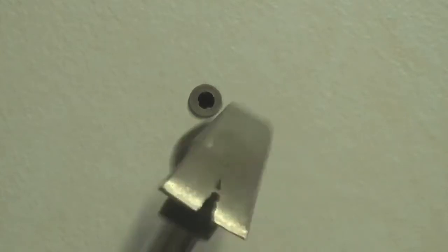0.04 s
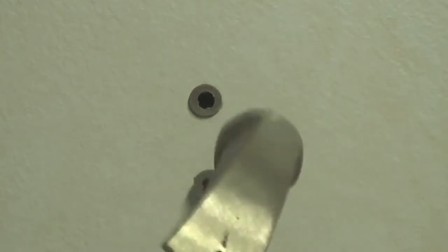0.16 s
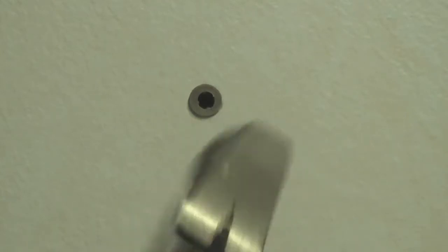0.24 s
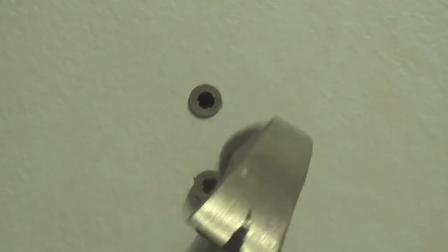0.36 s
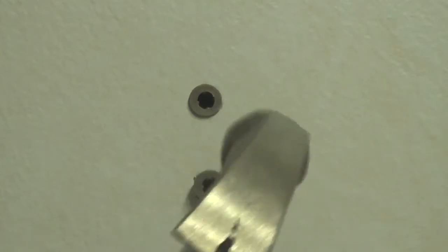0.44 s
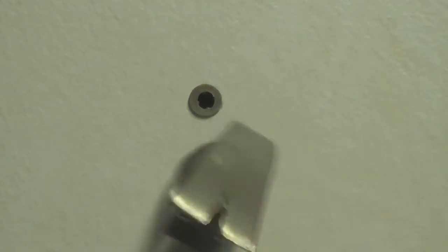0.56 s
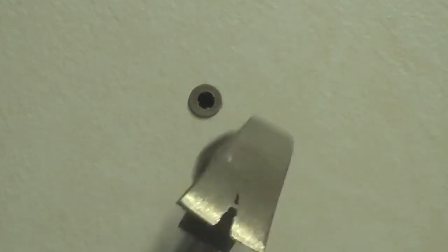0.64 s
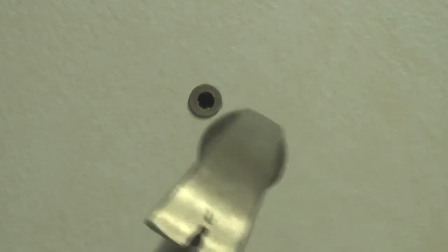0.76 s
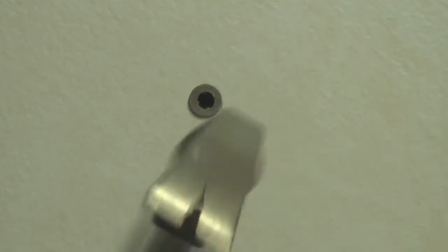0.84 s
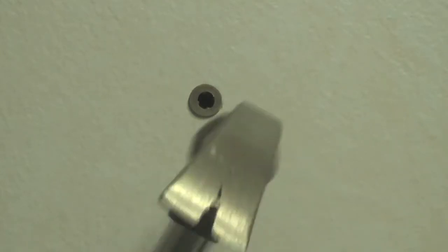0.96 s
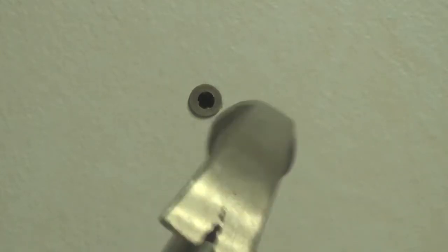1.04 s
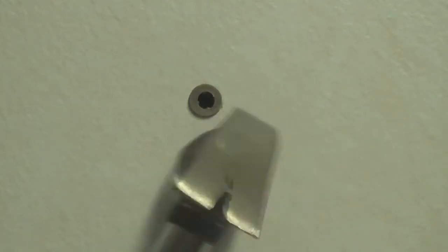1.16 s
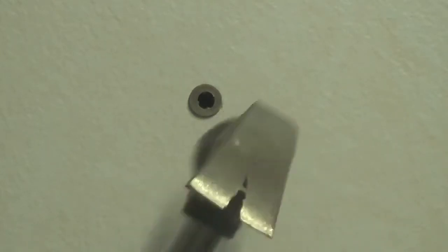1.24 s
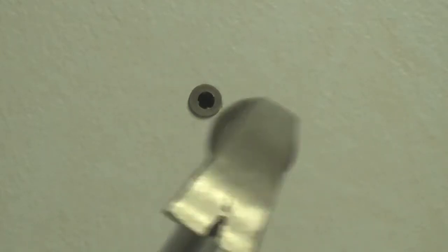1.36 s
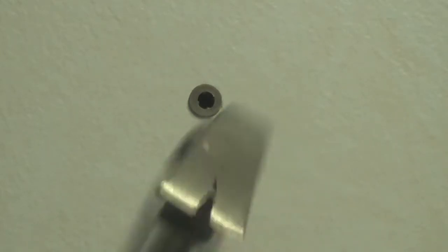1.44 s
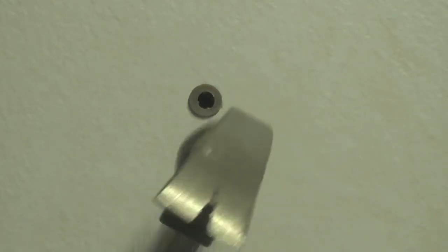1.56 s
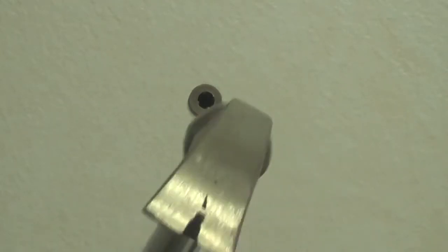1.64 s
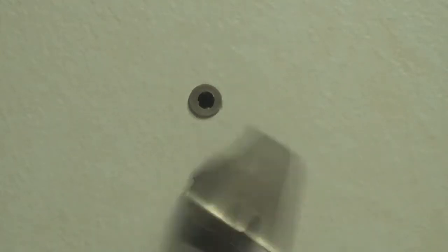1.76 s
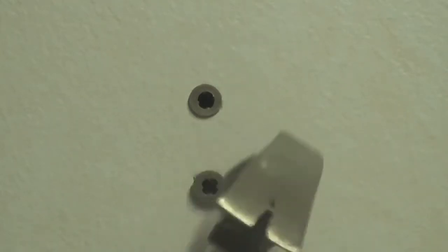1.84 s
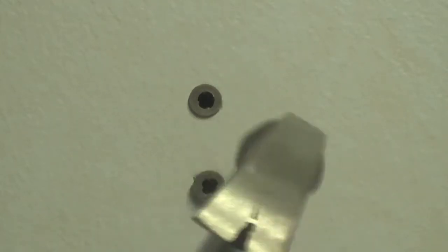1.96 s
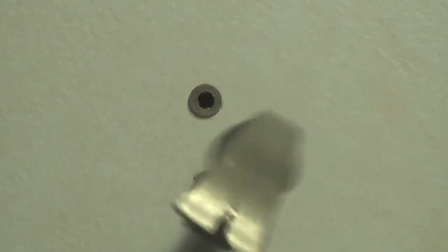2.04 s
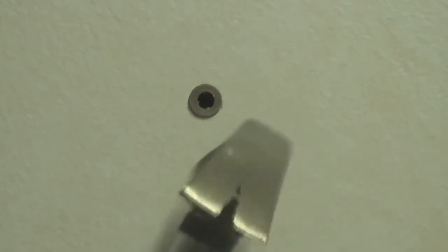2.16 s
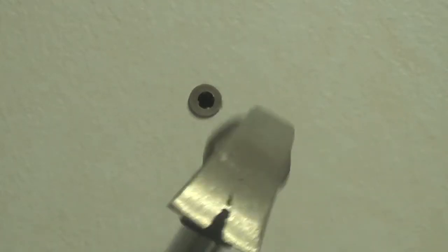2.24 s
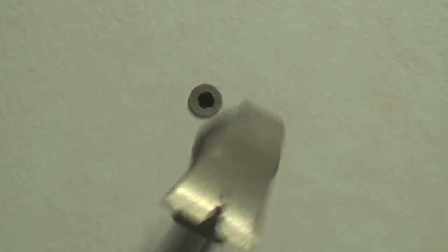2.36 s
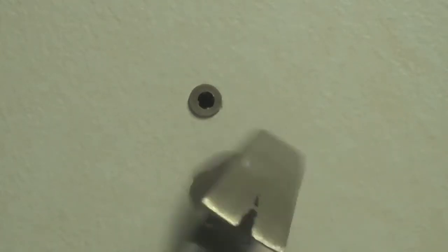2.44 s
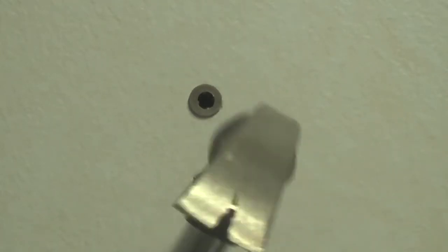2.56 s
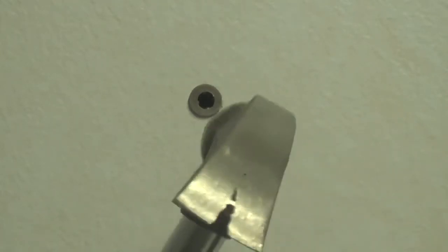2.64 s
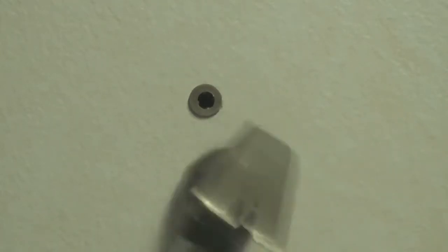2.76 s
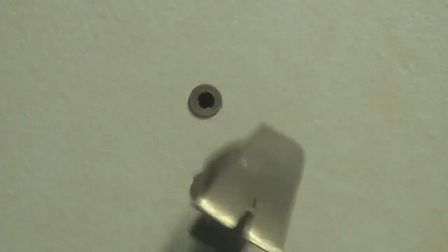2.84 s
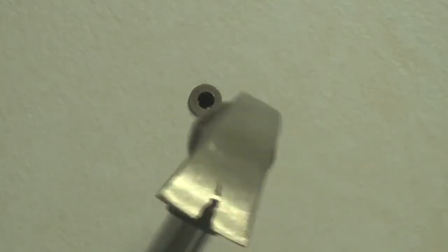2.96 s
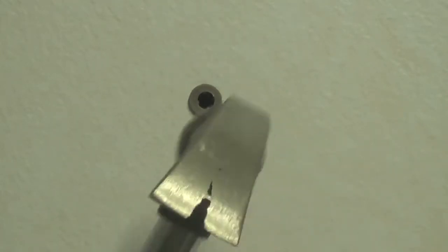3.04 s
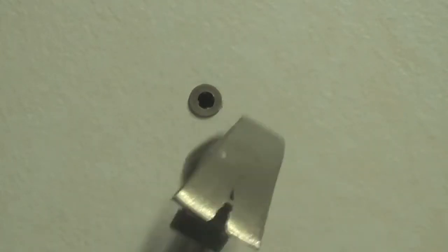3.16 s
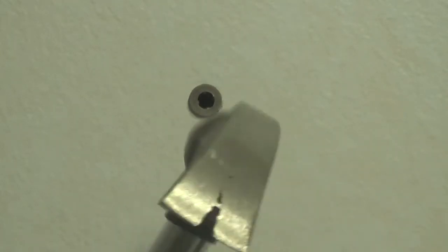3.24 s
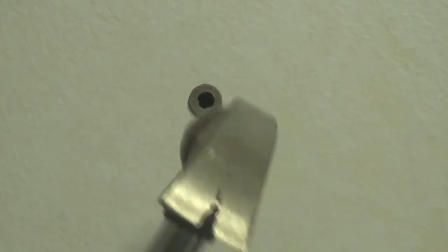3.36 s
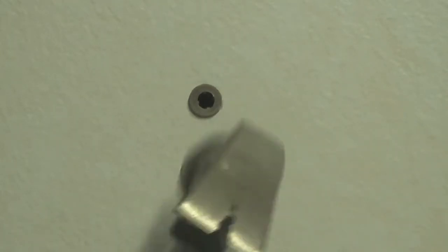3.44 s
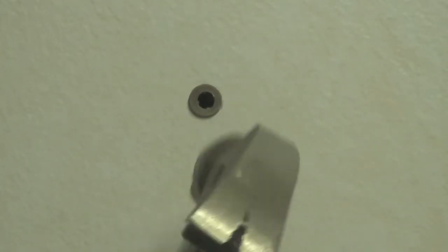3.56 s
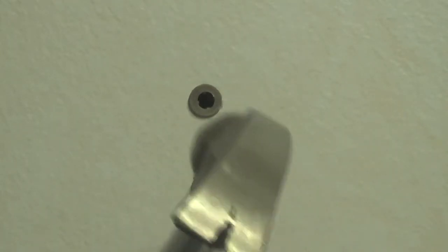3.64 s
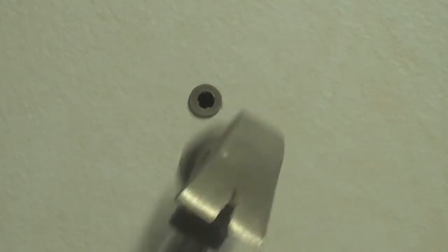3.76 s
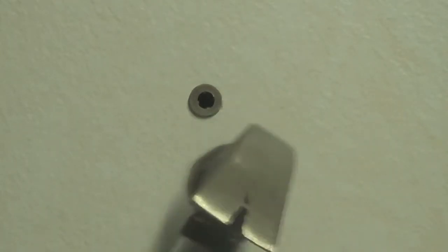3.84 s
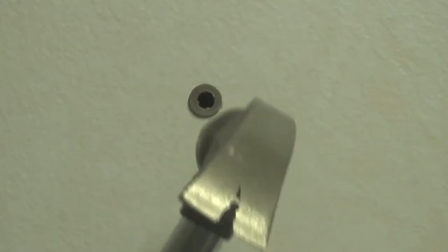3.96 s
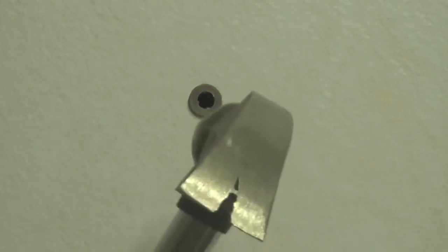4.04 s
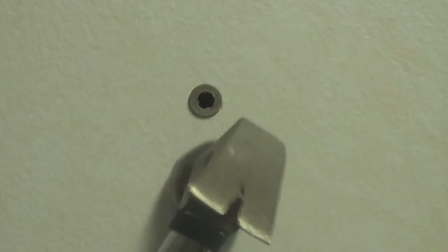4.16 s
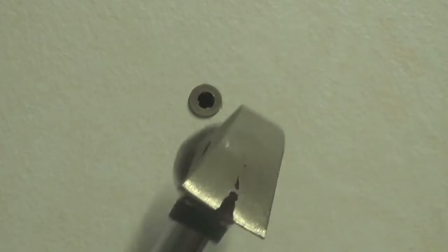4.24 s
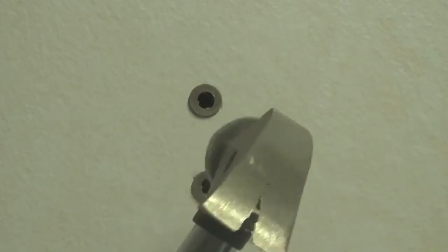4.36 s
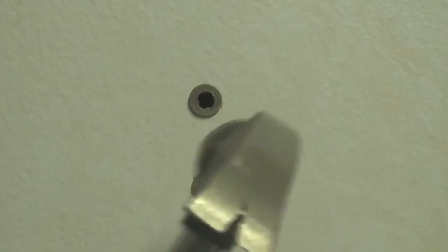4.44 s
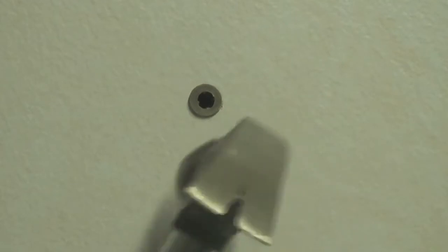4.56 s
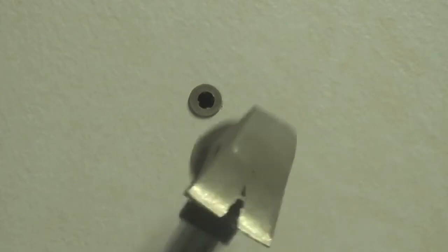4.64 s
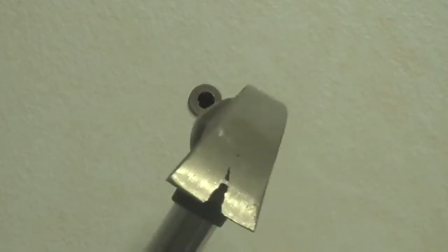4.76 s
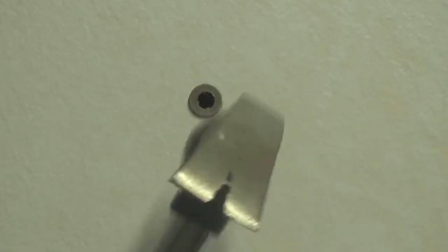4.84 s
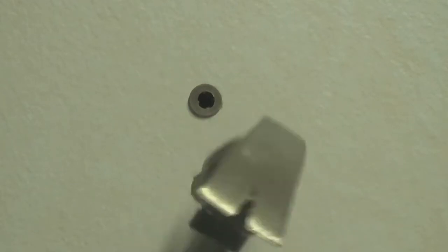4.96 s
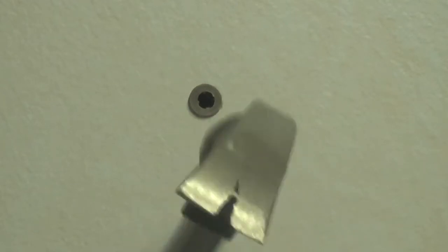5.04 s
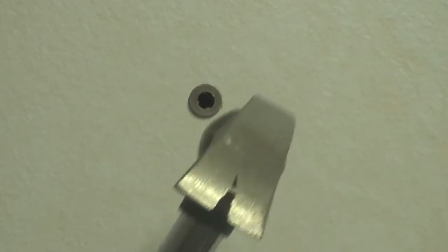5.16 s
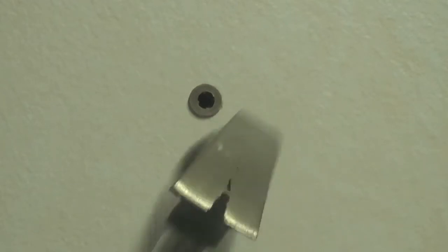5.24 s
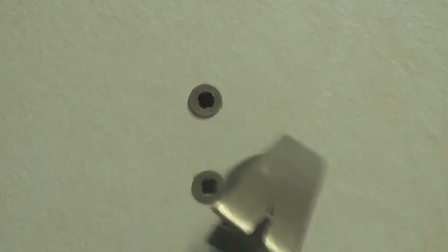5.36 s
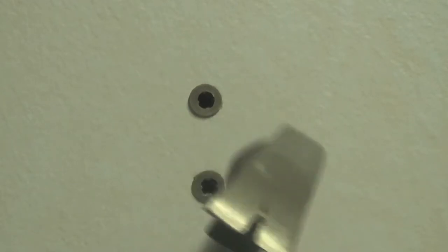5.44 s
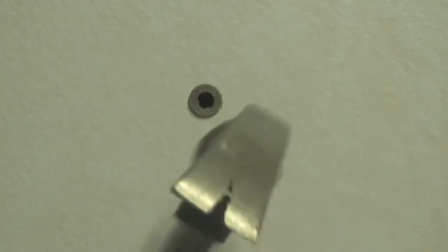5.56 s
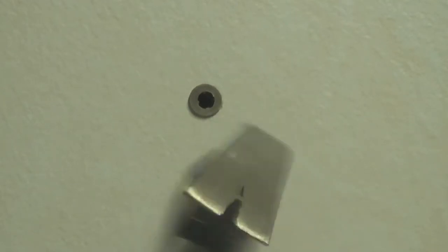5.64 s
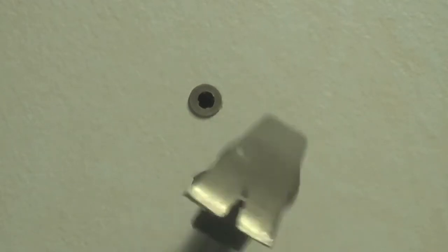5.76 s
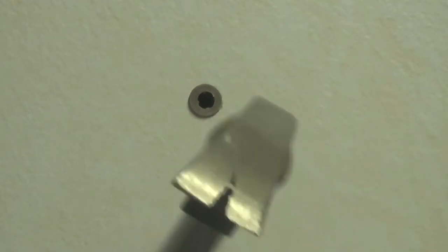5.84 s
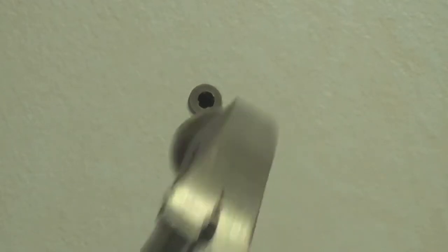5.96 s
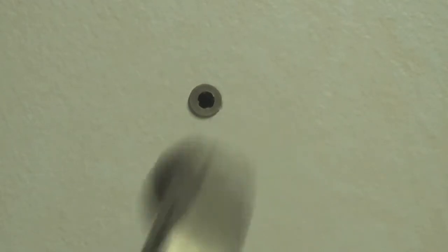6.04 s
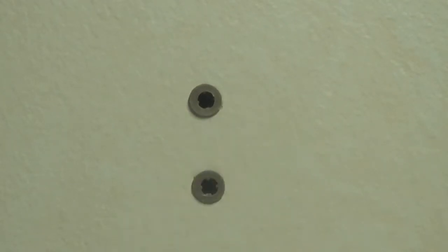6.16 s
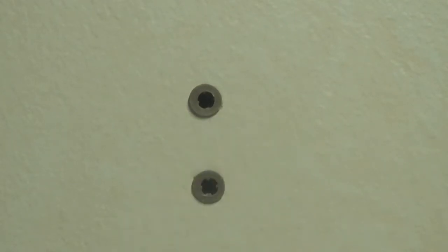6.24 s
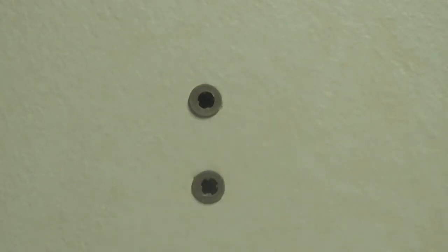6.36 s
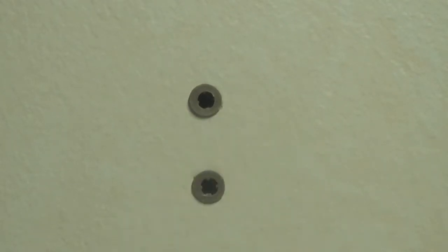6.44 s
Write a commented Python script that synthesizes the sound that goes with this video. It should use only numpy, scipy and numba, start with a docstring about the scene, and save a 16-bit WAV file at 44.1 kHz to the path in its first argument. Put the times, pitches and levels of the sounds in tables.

```python
"""A small steel hammer taps a plastic anchor into a hollow wall, close up in a bare room.
We open on the tail of a blow, over quiet air, hum and a thin camera whine. Each new tap cracks on the
plastic, then rings the same low modes of wall and room; above them, dense modes blur into a decaying wash,
coloured by how the hammer face lands. A limiter flattens the front of each hit.
The taps gradually slow, and the knock turns hollower as the anchor seats."""
import sys
import numpy as np
from scipy import signal
from scipy.fft import rfft, irfft
from scipy.io import wavfile
from numba import njit

SR = 44100
rng = np.random.default_rng(int(sys.argv[2]) if len(sys.argv) > 2 else 0)


def to_wav(sig):
    """Store sig (one row per channel, or 1-D mono) as 16-bit WAV at the path in sys.argv[1].

    Samples outside -1..1 are clipped; the rate is SR.
    """
    pcm = np.clip(np.atleast_2d(sig), -1, 1) * 32767
    pcm = np.round(pcm).astype(np.int16)
    wavfile.write(sys.argv[1], SR, pcm.T)  # frames by channels


N = 286340

# The hits; the first lands before the start: (time [s], strength [dB], hardness as treble [dB],
# hollow knock [dB], treble spit [dB], dip centre [Hz], dip depth [dB])
BLOWS = [(-0.1154, 4, 1.5, -2.5, -23, 3540, 1.5), (0.1756, 4, 1, -1.5, -16, 3460, 2),
         (0.4694, 3, 1.5, -2.5, -16, 3270, 15.5), (0.7718, 3, 5, -3.5, -26, 3640, 1.5),
         (1.0741, 3, 2.5, -3, -27, 3470, 7), (1.3665, 2.5, 2, -1.5, -16.5, 5470, -0.5),
         (1.6646, 1, 5, -1.5, -13, 5450, 0), (1.9776, -3, 7.5, 2.5, -43, 4330, 12),
         (2.3023, -4.5, 6.5, 4, -13, 3340, 14.5), (2.627, -2, 3.5, -1.5, -19, 5460, 0),
         (2.9791, -1.5, 2.5, 0, -18.5, 2850, 10), (3.3053, -2, 10, -3, -7.5, 1420, 4.5),
         (3.6821, -0.5, -1.5, -4, -19.5, 3670, 8.5), (4.0109, 1.5, -2.5, -1, -19, 1780, 0.5),
         (4.3771, 0.5, -2, 3, -18.5, 2460, 12), (4.7247, 1.5, -3, 2.5, -24, 6800, 4),
         (5.094, 1, -0.5, 1.5, -19, 1900, -0.8), (5.4743, 0.5, -1, 5.5, -43, 6300, 7.5),
         (5.834, 3, -5, 4.5, -22, 4100, 8)]
# Tone colour of the hammer's contact: (frequency [Hz], base gain [dB], tilt with strength [dB/dB],
# tilt with hardness [dB/dB], tilt with knock [dB/dB])
CONTACT_COLOUR = [(117, -1.5, -.5, 0, 0), (410, -1, 0, 0.5, 0.5), (590, -1, 0.5, 0.04, 0.68),
                  (786, -0.5, 0.32, 0.56, 1.5), (1110, -3, 0.19, 0.91, 0.25), (2440, -1, 0, 1.1753, 0.5),
                  (3270, 0.5, 0, 1, 0.62), (8450, -3, 0.5, 1.33, 0.32), (13000, -5, 1, 0.84, 0)]
# Body of the hollow wall; the sign of a swing says which side of the node the microphone is on:
# (frequency [Hz], t60 [s], left swing [linear], right swing [linear])
WALL_MODES = [(292.6, 0.44, -0.109, -0.168), (304.3, 0.51, 0.094, 0.081), (312.3, 0.36, -0.228, 0.153),
              (316.9, 0.32, -0.001, -0.243), (352.8, 0.35, -0.11, -0.12), (359.0, 0.4, 0.172, 0.256),
              (369.9, 0.28, -0.507, -0.757), (372.1, 0.28, 0.701, 0.661), (379.4, 0.3, -0.471, -0.215),
              (386.9, 0.28, -0.166, -0.412), (395.0, 0.28, 0.257, -0.101), (399.5, 0.28, -0.318, 0.091),
              (421.7, 0.7, 0.046, 0.065), (426.7, 0.33, -0.202, -0.189), (440.7, 0.33, 0.247, 0.435),
              (450.0, 0.53, -0.061, -0.071), (458.0, 0.28, -0.227, -0.412), (464.9, 0.28, 0.413, 0.49),
              (471.0, 0.44, 0.208, 0.313), (476.6, 0.43, 0.142, 0.249), (498.0, 0.28, -0.353, -0.309),
              (510.5, 0.33, -0.102, -0.232), (521.8, 0.42, -0.069, -0.135), (527.6, 0.28, 0.242, 0.177),
              (558.8, 0.35, 0.079, 0.232), (579.7, 0.34, 0.087, 0.076), (638.7, 0.28, 0.089, 0.162),
              (662.1, 0.28, -0.101, -0.095), (714.6, 0.65, 0.03, 0.037), (773.0, 0.28, 0.052, 0.058)]
# Lowest standing waves of the room: (frequency [Hz], t60 [s], left swing [linear], right swing [linear])
ROOM_MODES = [(121.1, 0.39, 0.033, 0.044), (126.4, 0.28, 0.088, 0.133), (130.4, 0.42, -0.086, -0.08),
              (220.1, 0.31, -0.243, 0.166), (222.0, 0.28, 0.102, -0.33), (234.3, 0.38, -0.009, -0.101),
              (245.8, 0.33, 0.084, 0.095), (257.9, 0.52, -0.019, -0.044), (267.4, 0.31, 0.076, 0.046)]
# The dense tail, before the contact colours it:
# (frequency [Hz], band level [dB], t60 [s], left-right likeness [0-1], left minus right [dB])
WASH_BANDS = [(30, -60, 0.5, .8, 0), (72, -37.5, 0.19, .95, 5), (93.5, -46, 0.37, 1, 1),
              (135, -26, .45, .6, -3), (185, -27, .4, .6, -3), (260, -23, .45, .5, -2),
              (530, -23, .45, .5, -2), (710, -25, 0.44, 0.4, 3), (805, -18.5, 0.39, 0.66, -0.5),
              (1083, -21.5, 0.39, 0.64, -3), (1270, -15.5, 0.37, 0.63, 0.2),
              (1436, -16.5, 0.34, 0.67, -2.7), (1720, -22, 0.36, 0.6, 0), (2042, -29.5, 0.38, 0.68, -0.5),
              (2280, -18.5, 0.4, 0.58, -.5), (2770, -26.5, 0.35, 0.67, -1), (3320, -28, 0.39, 0.73, -1),
              (4100, -33.5, 0.41, .7, -.3), (6580, -41.5, 0.36, 0.68, 0), (11400, -45.5, 0.31, 1, -.3),
              (16300, -79, 0.6, 0.8, 0)]
# Clack of the plastic collar: (frequency [Hz], t60 [s], relative level [dB])
COLLAR_MODES = [(2340, 0.015, -7.5), (3260, 0.0042, -8.5)]
# Direct path and first reflections: (delay [s], clack gain [dB], spit gain [dB])
ARRIVALS = [(.0002, -6, -2.5), (.00155, -1.5, 4), (.0027, -6.5, -20), (.0055, -3.5, -7)]
# Bed of air and hiss: (frequency [Hz], relative noise density [dB])
AIR_SPECTRUM = [(20, -6), (60, 2.5), (130, -6), (250, -7.5), (500, 1.5), (700, -5.5), (2000, -12),
                (4000, -18), (15500, -27.5)]
# Steady hum and camera whine: (frequency [Hz], rms level [dB])
STEADY_TONES = [(129, -68), (7867, -92), (15734, -81)]

RING_SAMPLES, MODES_GAIN_DB = int(.6 * SR), 1
WASH_RISE_S, LANDING_SPREAD_RAD = 0.00091, 0.65  # each blow lands a little differently
DIP_OCTAVES = 0.36  # half width of the dip where the contact time cancels the push
NEXT_DIP_RATIO, NEXT_DIP_SHARE = 2.3, 0.37  # a shallower dip repeats higher up
SPIT_BAND_HZ, SPIT_DECAY_S = (5000, 11300), 0.00081
AIR_DB, AIR_LIKENESS = -58, 0.69
LIMIT_DB, LIMIT_RATIO, ATTACK_S, RELEASE_S, AHEAD_S = -8.5, 7.8, 0.00063, 0.023, 0.0044
HIGH_CUT_HZ = 15760


def hammer():
    """Each blow layers low modes, wash and crack, shaped by the colour of that contact."""
    out = np.zeros((2, N + 2 * RING_SAMPLES))
    centres, bands = wash()
    mode_hz, t60, *swing = np.transpose([*ROOM_MODES, *WALL_MODES])
    modes = undb(MODES_GAIN_DB) * ring(mode_hz, t60, RING_SAMPLES)
    spot_reach = np.clip(centres / 800 - .5, 0, 1)  # the landing spot only matters above 400 Hz
    for time_s, blow_db, hard_db, knock_db, spit_db, dip_hz, dip_db in BLOWS:
        colour = contact(blow_db, hard_db, knock_db, dip_hz, dip_db)
        spot = LANDING_SPREAD_RAD * rng.standard_normal(len(centres)) * spot_reach
        blend = colour(centres)[:, None] * np.array([np.cos(spot), np.sin(spot)]).T
        body = (swing * colour(mode_hz)) @ modes
        hit = body + np.einsum("bp,bcpn->cn", blend, bands)  # band, channel, pattern, sample
        tick = crack(colour, spit_db)
        hit[:, :len(tick)] += tick
        start = RING_SAMPLES + int(time_s * SR)
        out[:, start:start + RING_SAMPLES] += undb(blow_db) * hit
    return out[:, RING_SAMPLES:RING_SAMPLES + N]


def contact(blow_db, hard_db, knock_db, dip_hz, dip_db):
    """EQ curve of one contact: strength, hardness and knock tilt it, the contact time notches it."""
    points_hz, *tilts = np.transpose(CONTACT_COLOUR)
    broad_db = np.dot([1, blow_db, hard_db, knock_db], tilts)

    def colour(hz):
        dip, next_dip = (np.exp(-(np.log2(hz / centre_hz) / DIP_OCTAVES) ** 2)
                         for centre_hz in (dip_hz, NEXT_DIP_RATIO * dip_hz))
        return undb(along(hz, points_hz, broad_db) - dip_db * (dip + NEXT_DIP_SHARE * next_dip))
    return colour


def crack(colour, spit_db):
    """Steel meeting plastic: a clack and a spit of treble, heard straight and off the nearest surfaces."""
    hz, t60, db = np.transpose(COLLAR_MODES)
    size = RING_SAMPLES // 32
    clack = (undb(db) * colour(hz)) @ ring(hz, t60, size)
    spit = rng.standard_normal(size) * np.exp(-np.arange(size) / SR / SPIT_DECAY_S)
    spit = signal.sosfilt(signal.butter(4, SPIT_BAND_HZ, "band", fs=SR, output="sos"), spit)
    return sum(np.roll(undb(clack_db) * clack + undb(spit_db + treble_db) * spit, int(delay_s * SR))
               for delay_s, clack_db, treble_db in ARRIVALS)


def ring(hz, t60, size):
    """Struck modes: one decaying sine each, set off at the instant of the blow."""
    t = np.arange(size) / SR
    return np.sin(2 * np.pi * np.outer(hz, t)) * undb(-60 * t / np.asarray(t60)[:, None])


def wash():
    """Sixth-octave bands of dense modes, each dying at its own rate; two patterns for two landing spots."""
    t = np.arange(RING_SAMPLES) / SR
    f = np.fft.rfftfreq(RING_SAMPLES, 1 / SR) + 1
    centres = 30 * 2 ** (np.arange(54) / 6)
    points_hz, *columns = np.transpose(WASH_BANDS)
    noise = rfft(rng.standard_normal((2, 2, RING_SAMPLES)))
    bands = []
    for hz in centres:
        db, t60, likeness, pan_db = (along(hz, points_hz, column) for column in columns)
        window = np.cos(np.pi / 2 * np.clip(6 * np.log2(f / hz), -1, 1)) ** 2
        mid, side = irfft(noise * window, RING_SAMPLES)
        envelope = (1 - np.exp(-t / WASH_RISE_S)) * undb(db - 60 * t / t60)
        pan = undb([[[pan_db / 2]], [[-pan_db / 2]]])
        bands.append(stereo(mid, side, likeness) / mid.std() * pan * envelope)
    return centres, np.array(bands)


def room_tone():
    """The bed: quiet indoor air and microphone hiss, with steady hum and whine."""
    f = np.fft.rfftfreq(N, 1 / SR) + 1
    t = np.arange(N) / SR
    spectrum = undb(along(f, *np.transpose(AIR_SPECTRUM)))
    mid, side = irfft(rfft(rng.standard_normal((2, N))) * spectrum, N)
    tones = sum(undb(db) * np.sqrt(2) * np.sin(2 * np.pi * hz * t) for hz, db in STEADY_TONES)
    return stereo(mid, side, AIR_LIKENESS) * undb(AIR_DB) / mid.std() + tones


def undb(db):
    """Decibels to linear gain."""
    return 10 ** (np.asarray(db) / 20)


def along(hz, points_hz, values):
    """Read a curve on a log-frequency axis."""
    return np.interp(np.log(hz), np.log(points_hz), values)


def stereo(mid, side, likeness):
    """Left and right from two unrelated noises: likeness 0 is wide, 1 is mono."""
    c = np.clip(likeness, 0, 1)
    return np.array([np.sqrt((1 + c) / 2) * mid + sign * np.sqrt((1 - c) / 2) * side for sign in (1, -1)])


@njit
def follow(peak, attack, release):
    """The limiter's envelope: rises fast, falls slowly."""
    envelope, level = np.empty(len(peak)), 0.
    for i in range(len(peak)):
        level += (peak[i] - level) * (attack if peak[i] > level else release)
        envelope[i] = level
    return envelope


def scene():
    """Hammer up front, room tone underneath."""
    return hammer() + room_tone()


def record(dry):
    """A look-ahead limiter holds down both channels together, then a steep high cut takes off the top."""
    ahead = int(AHEAD_S * SR)
    peak = np.append(np.abs(dry).max(axis=0)[ahead:], np.zeros(ahead))
    level = follow(peak, 1 / (ATTACK_S * SR), 1 / (RELEASE_S * SR))
    gain = np.minimum(1, undb(LIMIT_DB) / (level + 1e-9)) ** (1 - 1 / LIMIT_RATIO)
    high_cut = signal.ellip(10, .2, 70, HIGH_CUT_HZ, fs=SR, output="sos")
    return signal.sosfilt(high_cut, dry * gain)


dry = scene()
out = record(dry)
to_wav(out)
```